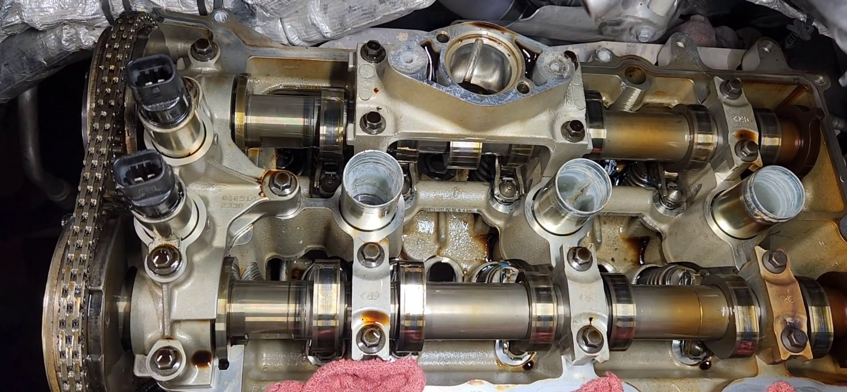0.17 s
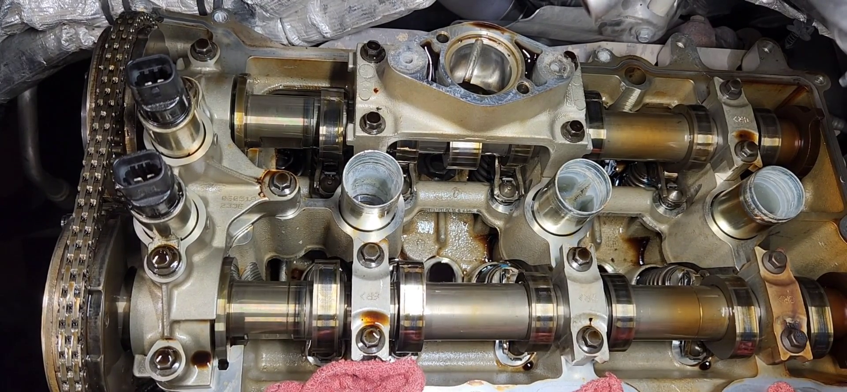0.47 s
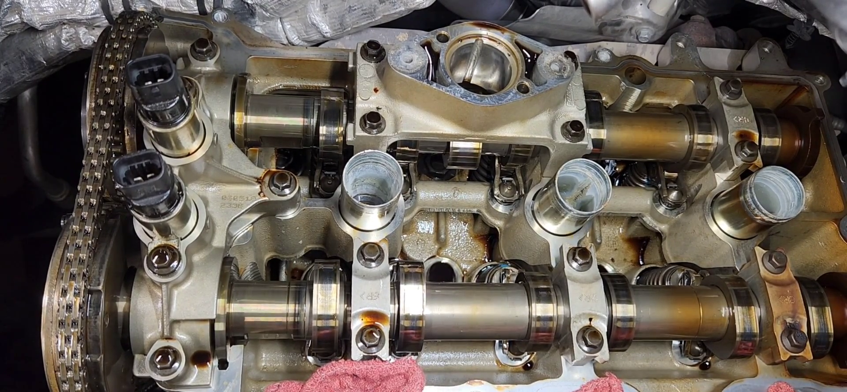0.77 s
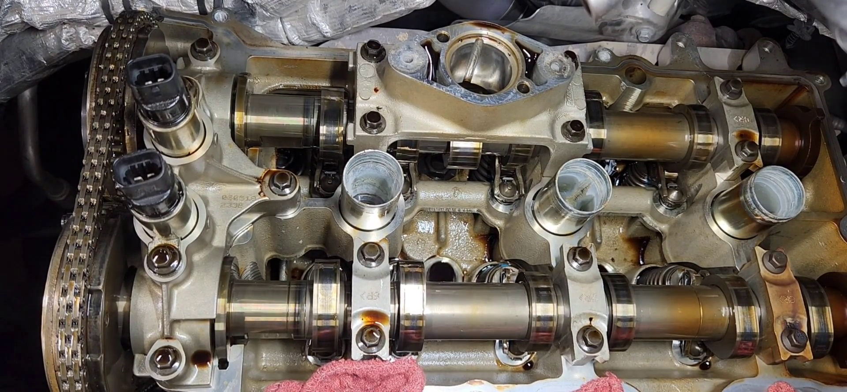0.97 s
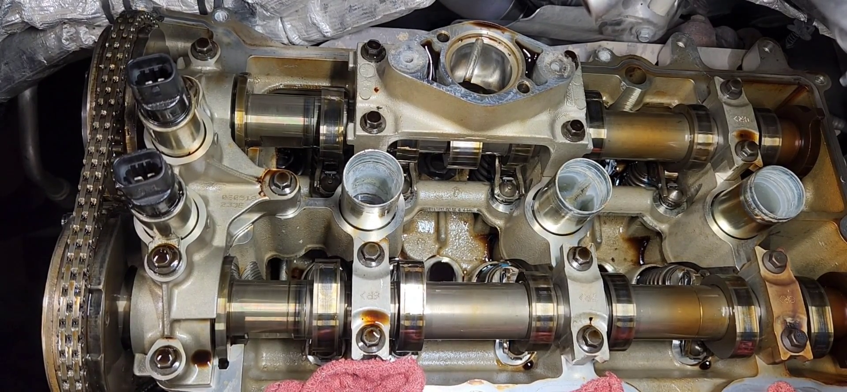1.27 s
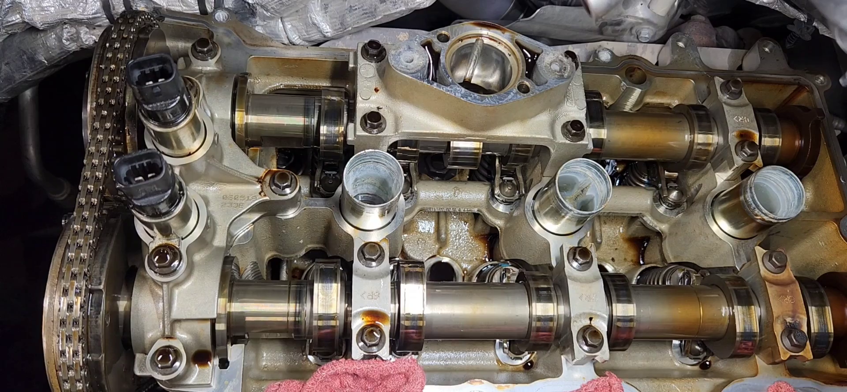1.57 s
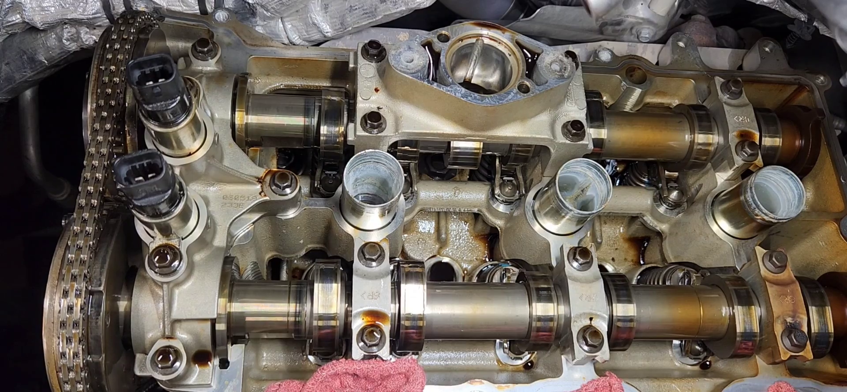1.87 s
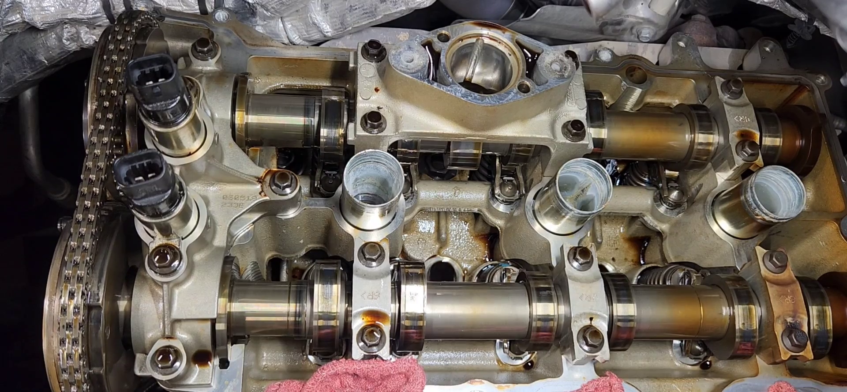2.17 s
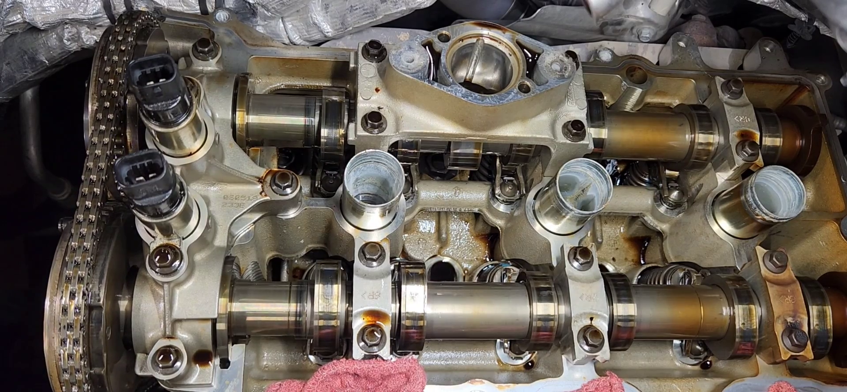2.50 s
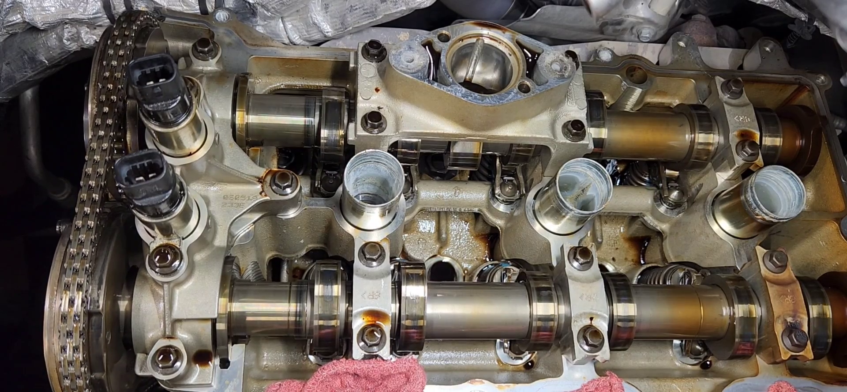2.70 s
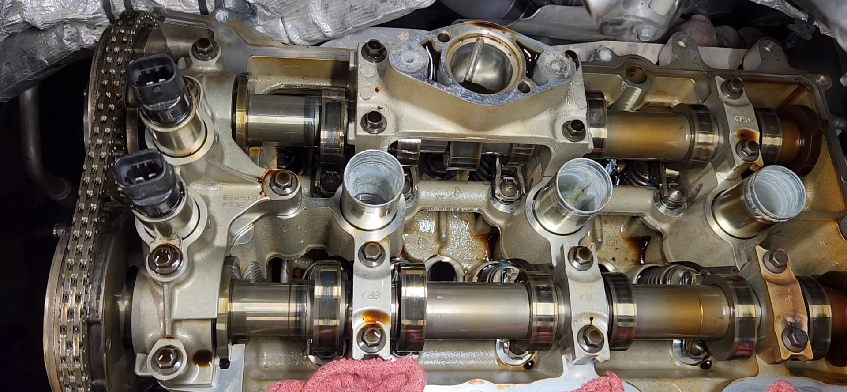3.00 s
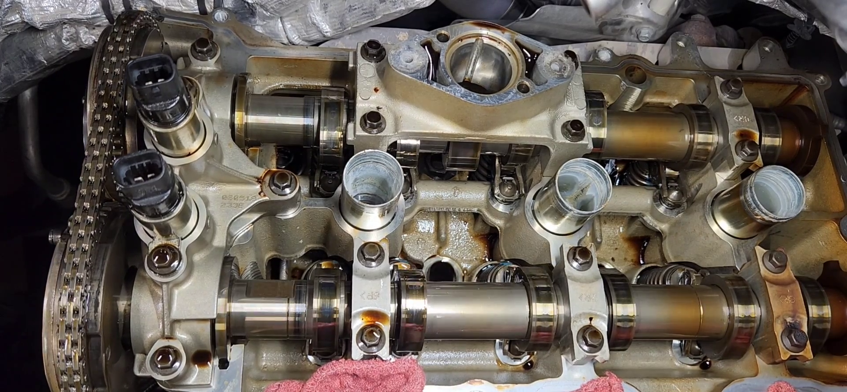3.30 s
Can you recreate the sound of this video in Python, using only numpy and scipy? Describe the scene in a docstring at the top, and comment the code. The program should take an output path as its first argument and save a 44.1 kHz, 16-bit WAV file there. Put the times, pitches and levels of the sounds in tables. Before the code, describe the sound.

Hand-turned engine clacks hard once, following five small ratchet clicks, soft rubbing and tiny ticks

```python
"""Hand-turned engine, valve cover off

Workshop interior, stereo microphone above the open engine: low rumble and thin hiss of shaped noise.
Five ratchet clicks to the left, each a noise burst plus ringing wrench modes and a dull tail.
Oiled parts slide as grainy noise; chain and valve gear tick faintly as short bands of noise.
A valve spring then snaps the camshaft over: a run of noise bursts makes one sharp clack,
and steel modes and a dense noise tail ring out."""
import sys
import numpy as np
from scipy import signal
from scipy.fft import rfft, irfft, next_fast_len
from scipy.io import wavfile

SR = 44100
rng = np.random.default_rng(int(sys.argv[2]) if len(sys.argv) > 2 else 0)


def put_to_file(sound):
    """Save the sound as 16-bit audio at rate SR, in the file named by the first command-line argument."""
    columns = np.atleast_2d(sound).T  # one column per channel
    safe = np.clip(columns, -1, 1)
    whole_steps = np.round(safe * 32767)
    wavfile.write(sys.argv[1], SR, whole_steps.astype(np.int16))


N = 152145
T = np.arange(N) / SR
RING_N = SR * 3 // 4  # samples given to each click, knock or ring

# In every table a positive left-right/dB means the left channel is louder.
# Likeness of the two channels, 1 = identical: [f/Hz, likeness]
LIKENESS = [(40, 0.92), (100, 0.98), (200, .6), (400, 0.32), (1000, 0), (16000, 0.087)]
# Spectrum of the workshop background: [f/Hz, relative level/dB]
WORKSHOP_COLOUR = [(12, -28.5), (20, -15.5), (45, -8.5), (72, -4.5), (130, -14), (220, -27.5), (340, -30),
                   (470, -30.5), (720, -26), (1000, -31.5), (1600, -51.5), (2750, -53), (7500, -60.5),
                   (9000, -69), (16000, -64)]
# Rubbing of oiled shaft and chain, before SLIDE_GAIN_DB: [t/s, level/dB]
SLIDE_LEVEL = [(0.0, -66.5), (0.12, -66), (0.27, -69), (0.67, -52), (0.77, -63), (0.92, -65.5),
               (1.08, -75.5), (1.64, -84.5), (1.82, -84.5), (1.96, -73), (2.18, -72.5), (2.36, -75.5),
               (2.62, -81), (2.76, -64), (2.89, -69.5), (3.03, -65)]
# Spectrum of the rub, before the casting ripple: [f/Hz, relative level/dB]
SLIDE_COLOUR = [(150, -12.5), (300, -0.5), (600, 1.5), (1000, -0.5), (1200, -6.5), (1500, 0.5),
                (2700, -8.5), (3400, -4.5), (4400, -11.5), (5200, -6), (6800, -14.5), (7500, -9.5),
                (8800, -28), (10500, -32), (12300, -21.5), (16000, -33.5)]
# Treble part of the rub: [t/s, level/dB]
SLIDE_TREBLE_LEVEL = [(1.85, -105), (1.98, -97.5), (2.1, -100), (2.28, -82), (2.4, -104), (2.62, -102),
                      (2.76, -78), (2.86, -80.5), (2.96, -74.5), (3.06, -75.5), (3.2, -110)]
# Ratchet clicks, ring level relative to the click:
# [t/s, level/dB, strongest ring f/Hz, ring level/dB, treble tilt/(dB per octave), click t60/s]
RATCHET_CLICKS = [(0.0988, -35.5, 4570, 1.5, -3.5, 0.065), (.1570, -27, 6280, 1, 2, 0.059),
                  (0.1987, -28, 7300, -1, 1.5, 0.041), (0.2465, -29.5, 7220, -0.5, 0, 0.04),
                  (0.3005, -35, 6220, -0.5, -0.5, 0.051)]
# Spectrum of a click before its tilt: [f/Hz, relative level/dB]
RATCHET_COLOUR = [(400, -36.5), (900, -11), (1300, -18), (2200, -4), (3300, -1.5), (6500, 0), (8300, -7),
                  (10500, -11), (12800, -6), (16000, -14)]
# Spectrum of the tail after a click: [f/Hz, relative level/dB]
RATCHET_TAIL_COLOUR = [(300, -11.5), (700, -4), (980, 1.5), (1250, -12.5), (1700, -8.5), (3000, -5),
                       (6500, -10), (9000, -11), (16000, -29.5)]
# Wrench modes, before tilt, scatter and the cycle cap: [f/Hz, level re click/dB, t60/s]
WRENCH_MODES = [(954, -19.5, 0.13), (1002.5, -19.5, 0.25), (1510, -20, 0.14), (1677, -22.5, .15),
                (2430, -17.5, 0.11), (3313, -11.5, .05), (4880, -11.5, 0.035), (6200, -4, .045),
                (9040, -16, 0.09), (9500, -11.5, 0.057), (11700, -16, 0.12), (12600, -12, 0.053),
                (14870, -16, .023), (15600, -13, .02)]
# Dying of the dense tail in bands: [f/Hz, early t60/s, level of the lingering part/dB]
TAIL_DECAY = [(80, 0.79, -26.5), (300, .6, -25.5), (1000, 0.5, -24), (3020, .46, -22), (5500, 0.45, -28),
              (7500, 0.35, -32.5), (10000, 0.24, -41), (16000, 0.25, -43.5)]
# Small knocks of chain and valve gear:
# [t/s, level/dB, left-right/dB, centre f/Hz, width/octaves, attack/s, t60/s]
KNOCKS = [(.716, -45.5, 10, 504, 1.03, 0.0062, 0.074), (.724, -48.5, 0.5, 160, 0.77, 0.025, .2),
          (.886, -52, 10, 830, 1.0, 0.0021, 0.21), (1.043, -52, -13.5, 170, 1.38, 0.0024, 0.1),
          (1.091, -60.5, -11.5, 960, 0.3, 0.0018, 0.086), (1.27, -52.5, -20.5, 2600, 1.05, 0.00078, 0.018),
          (1.500, -67.5, 8, 1300, 0.77, 0.0033, 0.16), (1.774, -60.5, 13, 1780, 0.52, 0.0092, 0.11),
          (1.977, -37, 12, 1170, 1.01, 0.0003, 0.012), (1.977, -40.5, 7, 444, 0.45, 0.0012, 0.031),
          (2.109, -65, 10, 2200, 0.12, .003, .06), (2.156, -54, 13, 5350, 0.56, 0.0089, 0.077),
          (2.161, -55, 10, 3180, .12, 0.0077, 0.057), (2.221, -57.5, 0, 968, 0.14, .012, 0.12),
          (2.227, -63.5, 5, 2230, 0.83, 0.01, 0.17), (2.280, -72.5, 3, 3850, 0.64, 0.0072, 0.14),
          (2.380, -60, -5, 380, 0.39, 0.0079, 0.083), (2.557, -64, 11, 1550, 0.6, .006, 0.18),
          (2.911, -50, -8, 5470, 0.29, 0.0011, 0.025), (2.990, -60, 2, 1580, 1.36, .004, 0.14),
          (3.039, -43, -6, 593, 1.3, 0.0012, 0.028), (3.046, -53, -4.5, 397, 0.66, .005, 0.25),
          (3.289, -50.5, -0.5, 700, 1.2, 0.0044, 0.12)]
# Noise bursts of the clack, a soft swelling one first:
# [t/s, level/dB, left-right/dB, ring f/Hz, ring lift/dB, attack/s, t60/s]
CLACK_BURSTS = [(3.078, -39.5, 17.5, 6430, 5.5, 0.015, 0.033), (3.0927, -30.5, 6.5, 3570, 4, 0.0024, 0.064),
                (3.0967, -18, 15, 3570, 0, 0.0015, .07), (3.1031, -9, 19, 5720, 13, 0.0011, 0.014),
                (3.108, -10.5, 14.5, 3780, 5.5, 0.00063, 0.024),
                (3.1081, -7, -20.5, 5480, 13.5, 0.0016, 0.0088),
                (3.1109, -17.5, -1.5, 1250, 12.5, 0.00075, 0.1)]
# Spectrum of the bursts before their ring lift: [f/Hz, relative level/dB]
CLACK_COLOUR = [(100, -30), (400, -16.5), (1000, -4), (1700, -8.5), (2300, -6), (2900, -7.5), (3600, 0),
                (4300, -7.5), (5600, -7.5), (7700, -6.5), (8500, -14.5), (10300, -18), (11700, -13),
                (14300, -14), (16000, -27.5)]
# Answer of engine block and room, before the casting ripple: [f/Hz, relative level/dB]
BOOM_COLOUR = [(60, -5), (150, -3), (250, -13.5), (370, -6), (470, -8.5), (700, -0.5), (1050, 0),
               (1500, -6.5), (2100, -2.5), (2700, -7.5), (3500, -0.5), (4400, -8), (5500, -4.5),
               (6200, -13.5), (7500, -9.5), (9500, -17.5), (12200, -5.5), (16000, -19.5)]
# Modes of camshaft, springs and head, before STEEL_T60_FACTOR: [f/Hz, level/dB, t60/s, left-right/dB]
STEEL_MODES = [(343, -39, .3, -2), (535, -31, .48, 3), (778, -32, .38, -2), (918, -34, .42, 4),
               (972, -29, .24, 9), (1013, -34, .38, 4), (1148, -31, .29, 1), (1231, -28, .13, -7),
               (1779, -34, .2, 8), (1860, -32, .2, -6), (2018, -32, .27, 9), (2505, -31, .17, 2),
               (3131, -43, .7, 0), (3353.5, -33, .48, 3), (3598, -27, .12, 2), (3657, -31, .2, 2),
               (3755, -26, .11, 6), (4362, -40, .4, 9), (4615, -28, .41, 17), (4717, -37, .36, 12),
               (4980, -30, .1, -5), (5172, -26, .12, -5), (5607, -24, .1, -2), (7208, -43, .22, 4),
               (9370, -47, .28, 12), (12250, -40, .15, 12), (12700, -41, .15, 12)]

WORKSHOP_DB, WORKSHOP_PAN_DB = -55, 0.5
SLIDE_GAIN_DB, SLIDE_PAN_DB, SLIDE_GRAIN_DB = 2, 8.5, 1.5
SLIDE_FADE_S, SLIDE_FADE_DB_PER_S = 3.4, 78.5
SLIDE_TREBLE_HZ, SLIDE_TREBLE_OCTAVES = 12500, .35
RATCHET_PAN_DB, RATCHET_ATTACK_S, RATCHET_TAIL_DB = 12, 0.00085, -23
PAWL_T60_S, WRENCH_SCATTER_DB = 0.046, 3
WRENCH_MAX_CYCLES = 520  # each wrench ring's t60 is at most this many cycles
KNOCK_TAIL_DB, KNOCK_TAIL_T60_S = -24.5, 0.17
CLACK_RING_OCTAVES = 0.32
BOOM_S, BOOM_DB, BOOM_ATTACK_S, BOOM_PAN_DB = 3.108, -26.5, 0.002, 1.5
STEEL_ATTACK_S, STEEL_T60_FACTOR = 0.00189, 0.98
LATE_T60_FACTOR = 2.2  # the lingering part of a tail decays this much more slowly
# many close resonances of the casting ripple the slide, knock and boom spectra
RIPPLE_SPACING_HZ, SLIDE_RIPPLE_DB, KNOCK_RIPPLE_DB, BOOM_RIPPLE_DB = 44.4, 4.5, 5.5, 1.5
CEILING, CUTOFF_HZ = .88, 16000


def from_db(db):
    """Decibels to gain."""
    return 10 ** (np.asarray(db) / 20)


def at_hz(points, hz):
    """Read a table on a log-frequency axis."""
    f, value = np.transpose(points)
    return np.interp(np.log(hz), np.log(f), value)


def grid(n):
    """Frequencies of an n-sample spectrum, kept above zero for the logarithms."""
    return np.maximum(np.fft.rfftfreq(n, 1 / SR), 1)


def panned(db):
    """Left and right gains of constant power, db apart."""
    gains = from_db(np.array([[db], [-db]]) / 2)
    return gains / np.sqrt(np.mean(gains ** 2))


def bell(hz, centre_hz, octaves):
    """A hump of height 1 around a pitch."""
    return np.exp(-.5 * (np.log2(hz / centre_hz) / octaves) ** 2)


def bell_db(hz, centre_hz, octaves):
    """The same hump in decibels, with a floor near -120 dB."""
    return 20 * np.log10(bell(hz, centre_hz, octaves) + 1e-6)


def ripple(hz):
    """Casting resonances: random hills and valleys along frequency, drawn with spread 1."""
    heights = rng.standard_normal(4000)
    return np.interp(hz / RIPPLE_SPACING_HZ, np.arange(len(heights)), heights)


def noise(colour_db, n):
    """Coloured stereo noise of rms 1, nearly alike in both channels in the bass."""
    alike = np.clip(at_hz(LIKENESS, grid(n)), -1, 1)
    mid, side = np.exp(2j * np.pi * rng.random((2, len(alike))))
    common = np.sqrt(1 + alike) * mid
    difference = np.sqrt(1 - alike) * side * [[1], [-1]]
    x = irfft(from_db(colour_db) * (common + difference), n)
    return x / np.sqrt(np.mean(x ** 2))


def envelope(attack_s, t60, n):
    """A straight rise, then an exponential decay of 60 dB in t60."""
    t, attack_s = T[:n], max(attack_s, 1 / SR)
    decay = np.exp(-np.log(1000) * np.maximum(t - attack_s, 0) / t60)
    return np.minimum(t / attack_s, 1) * decay


def mode(hz, t60, attack_s):
    """One ringing mode, a quarter cycle apart between the channels."""
    quarter = rng.choice([-1, 1]) * np.pi / 2
    phase = 2 * np.pi * rng.random() + np.array([[0], [quarter]])
    return np.sin(2 * np.pi * hz * T[:RING_N] + phase) * envelope(attack_s, t60, RING_N)


def tail(colour_db, attack_s):
    """Dense ringing of block and room: the treble dies sooner, a weak late part lingers."""
    spectrum, hz, out = rfft(noise(colour_db, RING_N)), grid(RING_N), 0
    centres = [row[0] for row in TAIL_DECAY]
    # each band fades into its neighbours, so the bands add up to the whole
    for share, (_, t60, late_db) in zip(np.eye(len(centres)), TAIL_DECAY):
        band = irfft(spectrum * at_hz(list(zip(centres, share)), hz), RING_N)
        early = envelope(attack_s, t60, RING_N)
        late = from_db(late_db) * envelope(attack_s, t60 * LATE_T60_FACTOR, RING_N)
        out = out + band * (early + late)
    return out


def add(out, s, sound):
    """Mix a sound in at a time."""
    start = int(s * SR)
    out[:, start:start + sound.shape[1]] += sound[:, :N - start]


def workshop():
    """Background of the room: steady noise with a low rumble and a thin hiss."""
    n = next_fast_len(N)
    hiss_and_rumble = noise(at_hz(WORKSHOP_COLOUR, grid(n)), n)[:, :N]
    return from_db(WORKSHOP_DB) * panned(WORKSHOP_PAN_DB) * hiss_and_rumble


def sliding():
    """Oiled metal rubs with a fine random grain, its body and treble rising and falling separately."""
    n = next_fast_len(N)
    hz = grid(n)
    knots = np.arange(N // 128 + 2)  # one random grain height every 128 samples
    grain = np.interp(np.arange(N) / 128, knots, rng.standard_normal(len(knots)))
    casting_db = SLIDE_RIPPLE_DB * ripple(hz)

    level_db = np.interp(T, *np.transpose(SLIDE_LEVEL)) + SLIDE_GAIN_DB
    level_db = level_db - SLIDE_FADE_DB_PER_S * np.maximum(T - SLIDE_FADE_S, 0)
    rub = from_db(level_db) * noise(at_hz(SLIDE_COLOUR, hz) + casting_db, n)[:, :N]

    treble_level_db = np.interp(T, *np.transpose(SLIDE_TREBLE_LEVEL))
    treble_colour_db = bell_db(hz, SLIDE_TREBLE_HZ, SLIDE_TREBLE_OCTAVES) + casting_db
    treble = from_db(treble_level_db) * noise(treble_colour_db, n)[:, :N]
    return from_db(SLIDE_GRAIN_DB * grain) * panned(SLIDE_PAN_DB) * (rub + treble)


def ratchet():
    """The pawl drops over each tooth: a bright click, the ring of the wrench and a duller tail."""
    out, hz = np.zeros((2, N)), grid(RING_N)
    for s, db, ring_hz, ring_db, tilt_db, t60 in RATCHET_CLICKS:
        click_db = at_hz(RATCHET_COLOUR, hz) + tilt_db * np.log2(hz / ring_hz)
        click = noise(click_db, RING_N) * envelope(RATCHET_ATTACK_S, t60, RING_N)
        ring = from_db(ring_db) * mode(ring_hz, PAWL_T60_S, RATCHET_ATTACK_S)
        for f, mode_db, mode_t60 in WRENCH_MODES:
            scatter_db = WRENCH_SCATTER_DB * rng.standard_normal()
            strength_db = mode_db + tilt_db * np.log2(f / ring_hz) + scatter_db
            capped_t60 = min(mode_t60, WRENCH_MAX_CYCLES / f)
            ring = ring + from_db(strength_db) * mode(f, capped_t60, RATCHET_ATTACK_S)
        room = tail(at_hz(RATCHET_TAIL_COLOUR, hz), attack_s=.004)
        room = from_db(RATCHET_TAIL_DB) * room * panned(db=2)
        add(out, s, from_db(db) * ((click + ring) * panned(RATCHET_PAN_DB) + room))
    return out


def knocks():
    """Oil-damped touches of links and followers: bands of noise, each with a faint centred tail."""
    out, hz = np.zeros((2, N)), grid(RING_N)
    for s, db, pan_db, centre_hz, octaves, attack_s, t60 in KNOCKS:
        colour_db = bell_db(hz, centre_hz, octaves) + KNOCK_RIPPLE_DB * ripple(hz)
        touch = panned(pan_db) * envelope(attack_s, t60, RING_N)
        faint_tail = from_db(KNOCK_TAIL_DB) * envelope(attack_s, KNOCK_TAIL_T60_S, RING_N)
        add(out, s, from_db(db) * noise(colour_db, RING_N) * (touch + faint_tail))
    return out


def clack():
    """A soft swell of noise, then a run of hard contacts, each a noise burst."""
    out, hz = np.zeros((2, N)), grid(RING_N)
    for s, db, pan_db, ring_hz, lift_db, attack_s, t60 in CLACK_BURSTS:
        colour_db = at_hz(CLACK_COLOUR, hz) + lift_db * bell(hz, ring_hz, CLACK_RING_OCTAVES)
        burst = noise(colour_db, RING_N) * envelope(attack_s, t60, RING_N)
        add(out, s, from_db(db) * panned(pan_db) * burst)
    return out


def boom():
    """Engine block and room answer the clack with a dense tail."""
    out, hz = np.zeros((2, N)), grid(RING_N)
    answer = tail(at_hz(BOOM_COLOUR, hz) + BOOM_RIPPLE_DB * ripple(hz), BOOM_ATTACK_S)
    add(out, BOOM_S, from_db(BOOM_DB) * panned(BOOM_PAN_DB) * answer)
    return out


def steel():
    """Camshaft, springs and head, struck by the clack, ring in decaying modes."""
    out = np.zeros((2, N))
    for f, db, t60, pan_db in STEEL_MODES:
        ring = mode(f, t60 * STEEL_T60_FACTOR, STEEL_ATTACK_S)
        add(out, BOOM_S, from_db(db) * panned(pan_db) * ring)
    return out


def scene():
    """Everything heard above the open engine."""
    return workshop() + sliding() + ratchet() + knocks() + clack() + boom() + steel()


def record(dry):
    """The microphone channel: the highest peaks are rounded and the top is cut."""
    rounded = dry / (1 + (dry / CEILING) ** 4) ** (1 / 4)
    lowpass = signal.ellip(10, .2, 80, CUTOFF_HZ, fs=SR, output="sos")
    return signal.sosfilt(lowpass, rounded)


dry = scene()
out = record(dry)
put_to_file(out)
```